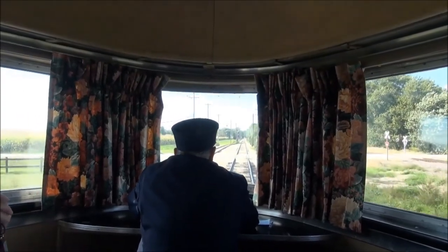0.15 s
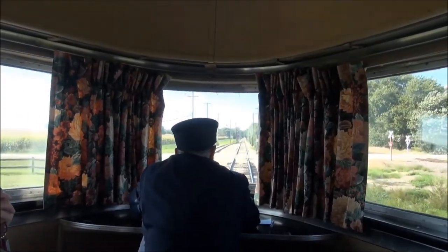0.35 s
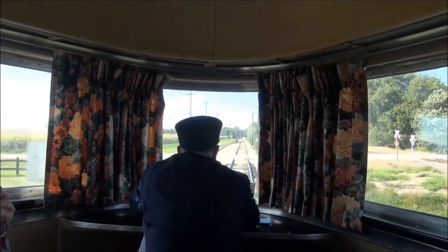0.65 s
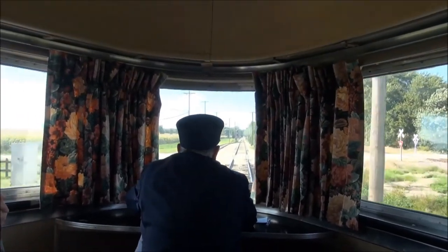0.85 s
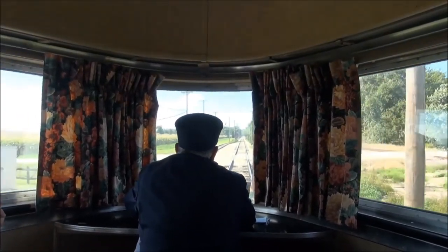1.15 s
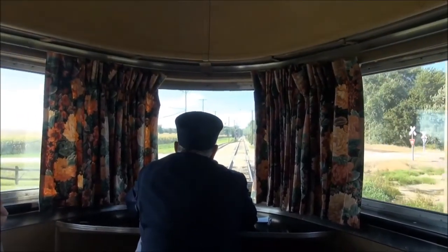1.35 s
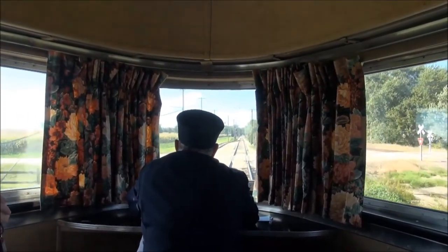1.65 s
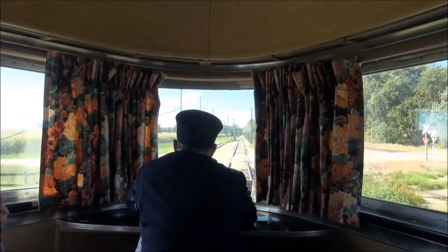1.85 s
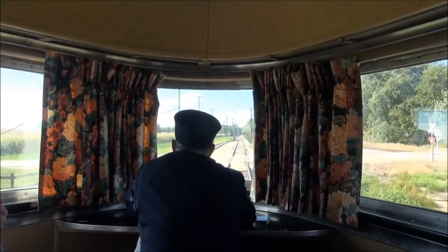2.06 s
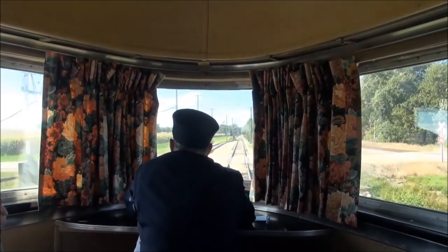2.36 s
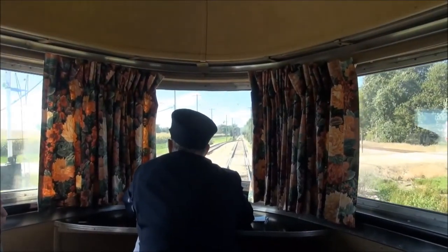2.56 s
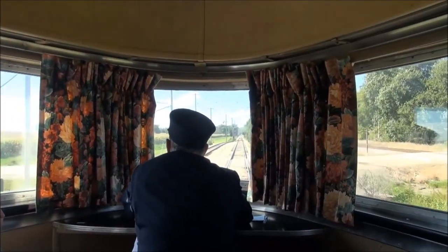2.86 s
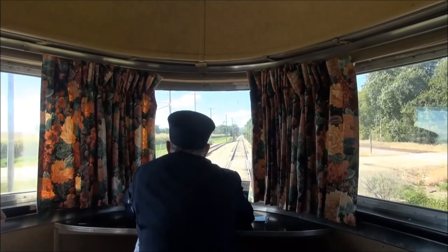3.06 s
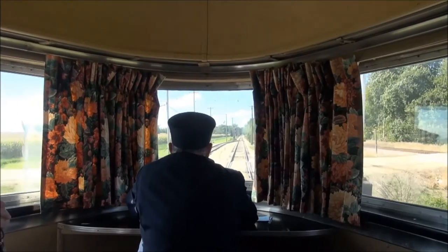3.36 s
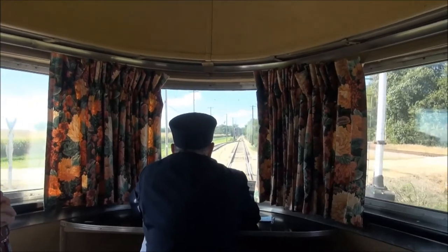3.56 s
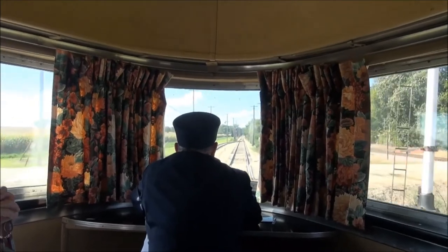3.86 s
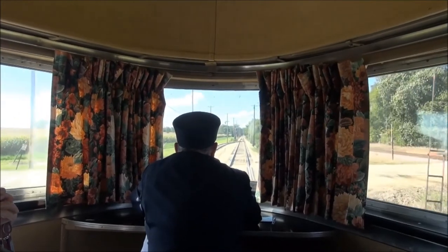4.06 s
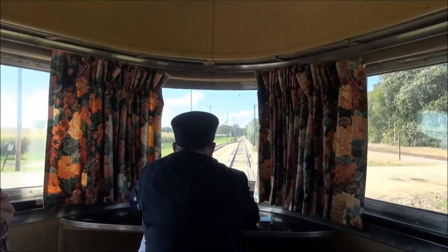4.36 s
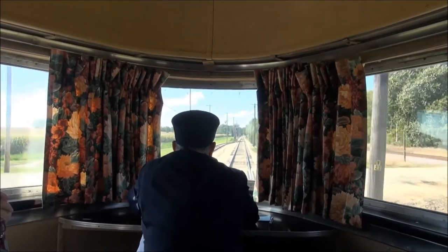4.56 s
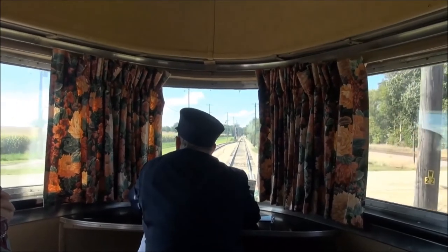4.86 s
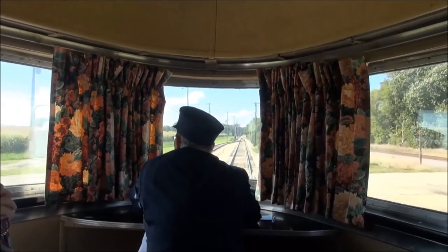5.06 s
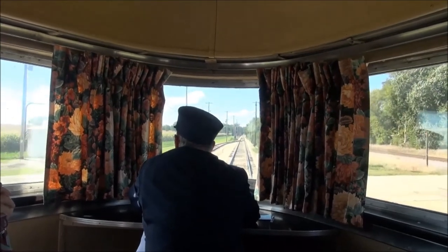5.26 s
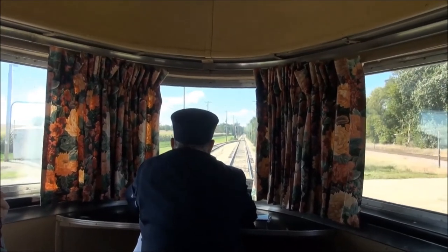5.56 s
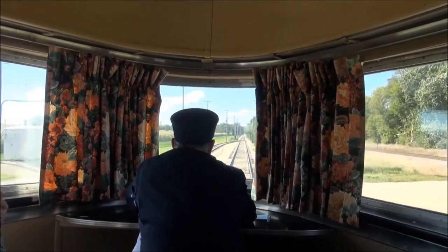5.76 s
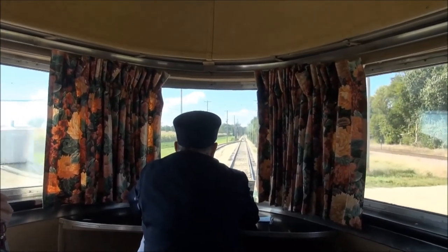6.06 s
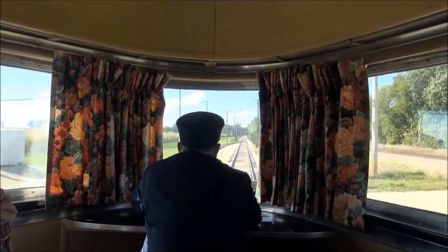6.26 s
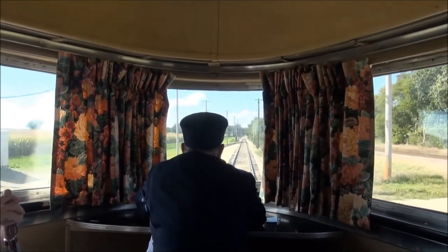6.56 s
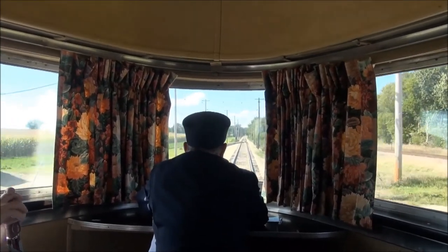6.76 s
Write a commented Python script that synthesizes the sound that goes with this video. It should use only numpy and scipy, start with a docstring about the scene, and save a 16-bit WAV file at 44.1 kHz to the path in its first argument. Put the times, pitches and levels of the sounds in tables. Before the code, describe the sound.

Inside a slowly rolling train carriage, compressed air escapes from a brake valve close to the microphone. The loud, bright hiss is there from the start and weakens gradually, faster near the end, without stopping. Underneath, a distant two-note train horn holds a faint low tone, clearest in the first second. The wheels add a barely audible rumble with a few soft thuds over rail joints.

```python
"""Compressed air escapes from a brake valve inside the rear lounge of a slowly rolling train.
The jet hisses through the resonances of its pipe. The hiss fades steadily, faster near the end.
Underneath, a far two-note air horn holds on for a road crossing
and the wheels rumble softly over rail joints."""
import sys
import numpy as np
from scipy import signal
from scipy.fft import rfft, irfft, next_fast_len
from scipy.io import wavfile
from scipy.ndimage import uniform_filter1d, map_coordinates

SR = 44100
rng = np.random.default_rng(int(sys.argv[2]) if len(sys.argv) > 2 else 0)


def dump_mix(stems):
    """Bounce the given channels to the path in sys.argv[1] as a 16-bit WAV at rate SR."""
    frames = np.atleast_2d(stems).T  # one column per channel
    limited = np.clip(frames, -1, 1)  # hard clip at full scale
    pcm = np.round(limited * 32767).astype(np.int16)
    wavfile.write(sys.argv[1], SR, pcm)


N = 305480
t = np.arange(N) / SR


def amp(db):
    """Decibels to gain."""
    return 10 ** (np.asarray(db) / 20)


def unit_rms(x):
    """x at rms 1."""
    return x / np.sqrt(np.mean(x ** 2) + 1e-20)


def at_hz(rows, hz):
    """(Hz, value) rows read on a log axis."""
    knots_hz, values = np.transpose(rows)
    return np.interp(np.log(hz + 1), np.log(knots_hz), values)


def envelope(rows):
    """(seconds, value) rows read at every sample."""
    return np.interp(t, *np.transpose(rows))


def ramp(start_s, length_s):
    """Linear rise from 0 to 1."""
    return np.clip((t - start_s) / length_s, 0, 1)


def wobble(rate_hz):
    """Smooth random curve, rate_hz knots a second."""
    knots = rng.standard_normal(int(N * rate_hz / SR) + 4)
    return map_coordinates(knots, [t * rate_hz])


def filtered(x, response):
    """Apply a gain given as a function of Hz."""
    size = next_fast_len(N + 8192)
    return irfft(rfft(x, size) * response(np.fft.rfftfreq(size, 1 / SR)), size)[..., :N]


# Each row: frequency in Hz, stereo side relative to mid in dB.
WIDTH_DB = [(60, -35), (300, -27), (600, -31), (1200, -51), (3800, -69), (5000, -35), (6000, -17.5),
            (7200, -16.5), (9700, -12.5), (10800, -7), (11800, -46)]

def noise(colour_db):
    """Nearly mono noise of rms 1, shaped by colour_db(hz)."""
    white = rng.standard_normal((2, N))
    mid, side = filtered(white, lambda hz: amp([colour_db(hz), colour_db(hz) + at_hz(WIDTH_DB, hz)]))
    return unit_rms(np.array([mid + side, mid - side]))


# Each row: centre in Hz, width in Hz, lift in dB.
PIPE_RESONANCES = [(1343, 140, 4.5), (1583, 44, 4), (1885, 105, 10), (2032, 137, 7.5), (2448, 48, 8),
                   (2640, 80, 1.5), (3000, 56, -2), (3395, 50, 7), (3540, 36, 5), (3823, 67, 4.5),
                   (4880, 34, 6), (5270, 60, 1), (5550, 190, 2.5), (5760, 150, -1.5), (6990, 204, 5),
                   (7260, 274, 6), (7600, 120, 0), (7800, 130, -1.5), (7980, 130, 4), (8330, 170, 5.5),
                   (8600, 130, -1), (10810, 220, 3.5), (11150, 160, -11.5), (11360, 150, 4.5)]

def pipe_db(hz):
    """Resonances of the valve and its pipe, and the notches between them."""
    return sum(lift_db / (1 + (2 * (hz - centre_hz) / width_hz) ** 2)
               for centre_hz, width_hz, lift_db in PIPE_RESONANCES)


def cabin_echoes(x, echo_db, spread_s, count=40):
    """Weak echoes off windows and ceiling comb the hiss with a fine, steady ripple."""
    delays_s = rng.uniform(.003, .003 + spread_s, count)
    gains = rng.standard_normal(count) * np.exp(-delays_s / spread_s)
    impulse = np.bincount((delays_s * SR).astype(int), gains)
    echoes = signal.fftconvolve(x, impulse[None] / np.linalg.norm(impulse), axes=1)[:, :N]
    return unit_rms(x + amp(echo_db) * echoes)


def eddies(x, depth_db, patch_bins=7, patch_frames=9):
    """Turbulence: short patches of the spectrum swell and sink on their own."""
    spectrum = signal.stft(x, nperseg=512)[2]
    patches = uniform_filter1d(rng.standard_normal(spectrum.shape[1:]), patch_bins, axis=0)
    patches = uniform_filter1d(patches, patch_frames, axis=1)
    spectrum *= amp(depth_db * unit_rms(patches))
    return unit_rms(signal.istft(spectrum, nperseg=512)[1][:, :N])


# Each row: time in seconds, hiss level in dB.
HISS_DB = [(0, -30.5), (.8, -30.5), (1.35, -31.7), (2.35, -32), (3.5, -34.5), (4.05, -35), (4.7, -36.3),
           (5.25, -36.6), (5.65, -39.5), (6.3, -42), (6.93, -45.3)]
# Each row: frequency in Hz, relative spectral density in dB.
JET_COLOUR_DB = [(1500, -45), (2800, -12), (3600, -10.5), (4400, -1), (6500, 1), (7800, -1.5),
                 (10300, -1.5), (12000, -5), (14000, -9.5), (15700, -15.5)]
RUSH_COLOUR_DB = [(150, -36), (260, -16.5), (370, -4), (460, -9), (580, -5), (800, -11.5), (920, -3.5),
                  (1100, -6), (1500, -3), (2300, -2.5), (2800, -2.5), (3500, -0.5), (6000, -16.5)]

def brake_air(rush_offset_db=-13.5, rush_db_per_hiss_db=.99, top_boost_db=3.5, top_fade_s=.48):
    """One fading level drives the turbulent jet and a lower rush; both resonate in the same pipe."""
    hiss_db = envelope(HISS_DB)
    rush_db = hiss_db.mean() + rush_offset_db + rush_db_per_hiss_db * (hiss_db - hiss_db.mean())
    flutter_db = .24 * wobble(22) + .2 * wobble(90)
    jet = noise(lambda hz: at_hz(JET_COLOUR_DB, hz) + pipe_db(hz))
    jet = cabin_echoes(jet, echo_db=-16, spread_s=.03)
    # The top treble is strongest at the start, and it flickers.
    top = filtered(jet, lambda hz: 1 / (1 + (10000 / (hz + 1)) ** 8))
    top_db = top_boost_db * np.exp(-(t / top_fade_s) ** 2)
    jet = eddies(jet, depth_db=.81)
    jet += top * (amp(top_db - top_db.mean() + .4 * wobble(24)) - 1)
    rush = noise(lambda hz: at_hz(RUSH_COLOUR_DB, hz) + pipe_db(hz))
    rush = eddies(rush, depth_db=1.22)
    return jet * amp(hiss_db + flutter_db + .08) + rush * amp(rush_db + flutter_db)


# Each row: time in seconds, open-valve level of the low fundamental in dB.
HORN_DB = [(.32, -58), (.7, -61.5), (1.15, -73), (1.45, -66.5), (2.4, -67), (3.2, -74), (3.8, -66),
           (4.3, -67), (4.6, -73), (5.05, -70.5), (5.7, -75.5), (6.93, -74.5)]

def air_horn(low_hz=345.2, high_hz=383.5, high_db=-73, high_fade_db_per_s=.9, waver=.0015):
    """Two reed horns a whole tone apart; the carriage lets only their lowest partials in."""
    # The low note idles until its valve opens; both notes start flat.
    open_s, attack_s, idle_db, flat_hz = .2202, .08, -13, 14
    pitch_hz = low_hz - flat_hz * (1 - ramp(open_s + attack_s / 2, length_s=.2997))
    low_db = envelope(HORN_DB) + idle_db * (1 - ramp(open_s, attack_s))
    # The octaves speak once the reeds are at full pressure, then fade ever faster.
    speak_s = .45
    octave_db = -65.5 - 6 * (t / 4.37) ** 2
    low_octave = ramp(speak_s, length_s=.18) * amp(octave_db)
    high_octave = low_octave * ramp(speak_s, length_s=1.3) * amp(-7.5)
    low_phase = 2 * np.pi * np.cumsum(pitch_hz * (1 + waver * wobble(12))) / SR
    high_pitch_hz = pitch_hz * high_hz / low_hz
    high_phase = 2 * np.pi * np.cumsum(high_pitch_hz * (1 + 1.68 * waver * wobble(12))) / SR
    partials = [(low_phase, amp(low_db)), (2 * low_phase, low_octave),
                (high_phase, amp(high_db - high_fade_db_per_s * t)), (2 * high_phase, high_octave)]
    # The long path outdoors fades each partial in and out on its own.
    return np.sqrt(2) * sum(gain * amp(1.4 * wobble(10)) * np.sin(phase) for phase, gain in partials)


# Each row: time in seconds, rolling level in dB before trim.
ROLL_DB = [(0.0, -71.5), (3.3, -76), (5.02, -74.5), (6.15, -85.5), (6.93, -86)]
# Each row: frequency in Hz, relative spectral density in dB.
ROLL_COLOUR_DB = [(15, -16), (45, -3), (63, 1), (85, -1), (125, -1.5), (180, 1.5), (240, -3.5), (400, -7.5),
                  (900, -35)]
# Each row: time in seconds, rumble in dB, thud gain in dB, rumble rise and fall in seconds.
RAIL_JOINTS = [(.83, -67, -63, 0.039), (1.17, -77, -72, .035), (1.95, -68, -76, .04),
               (3.28, -68, -80, 0.059), (3.66, -65, -75, .035), (5.01, -71, -88, .075),
               (5.43, -72, -67, .06)]

def wheels(floor_hz=62, ring_s=.058, roll_trim_db=1.6):
    """Rumble through the floor; each rail joint swells it and rocks the floor for a few cycles."""
    rumble_gain = amp(envelope(ROLL_DB) + roll_trim_db)
    thuds = np.zeros(N)
    for joint_s, rumble_db, thud_db, swell_s in RAIL_JOINTS:
        rumble_gain += amp(rumble_db) * np.exp(-np.abs(t - joint_s) / swell_s)
        age_s = np.maximum(t - joint_s, 0)
        ring = 2 * (np.exp(-age_s / ring_s) - np.exp(-3 * age_s / ring_s))
        thuds += amp(thud_db) * ring * np.sin(2 * np.pi * floor_hz * age_s)
    return rumble_gain * noise(lambda hz: at_hz(ROLL_COLOUR_DB, hz)) + thuds


def scene():
    """The near hiss, leaning slightly left in the treble, over horn and wheels."""
    # Each row: frequency in Hz, left boost and right cut in dB.
    lean_db = [(7000, 0), (9300, .8), (12000, 0)]
    air = filtered(brake_air(), lambda hz: amp([at_hz(lean_db, hz), -at_hz(lean_db, hz)]))
    return air + air_horn() + wheels()


def record(dry, cutoff_hz=15760):
    """Brick-wall low-pass."""
    return filtered(dry, lambda hz: hz < cutoff_hz)


dry = scene()
out = record(dry)
dump_mix(out)
```